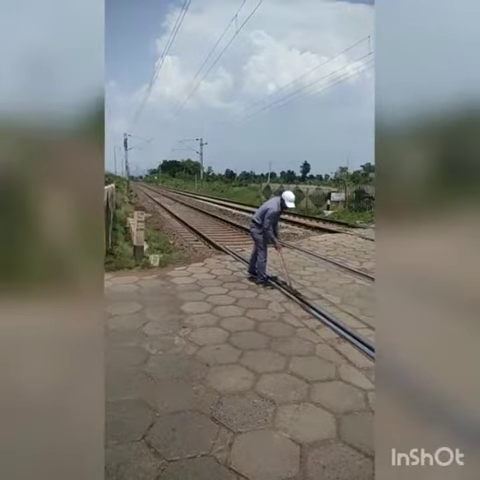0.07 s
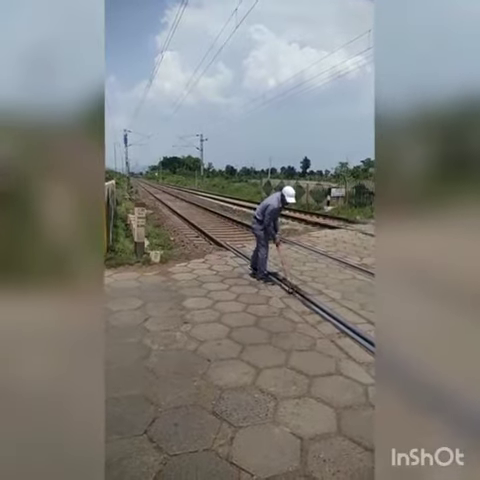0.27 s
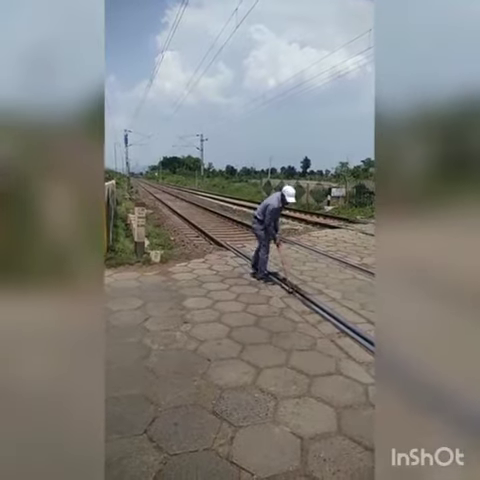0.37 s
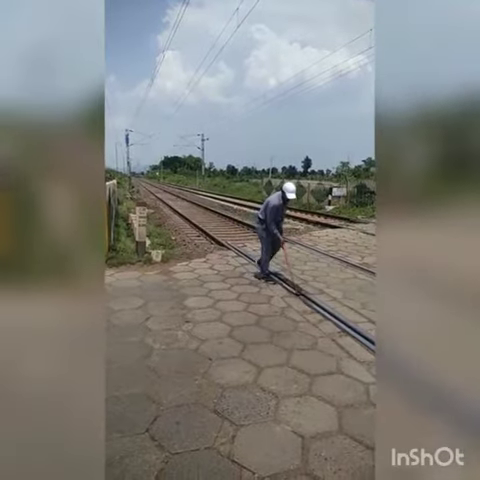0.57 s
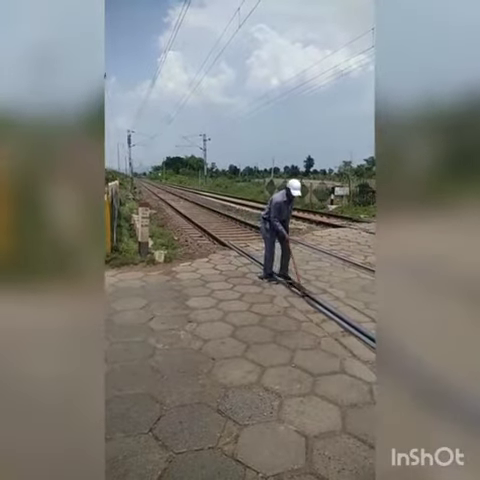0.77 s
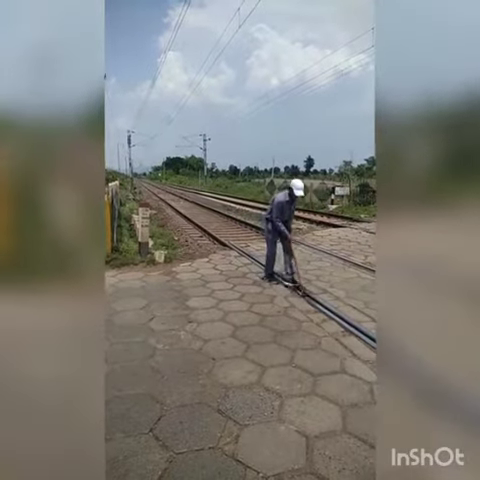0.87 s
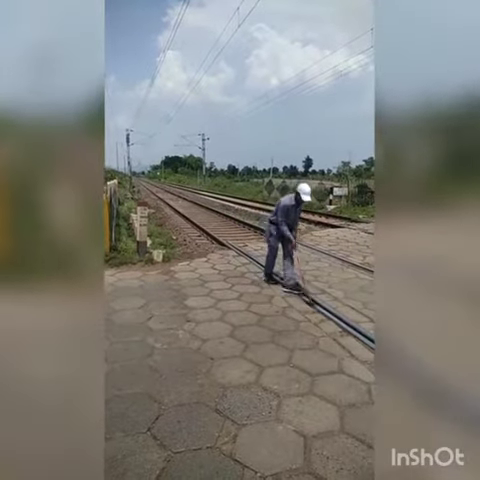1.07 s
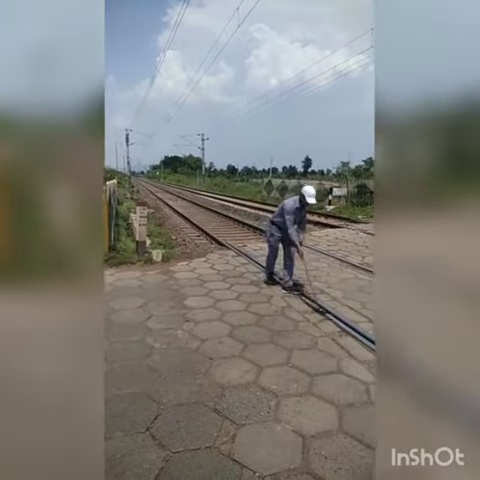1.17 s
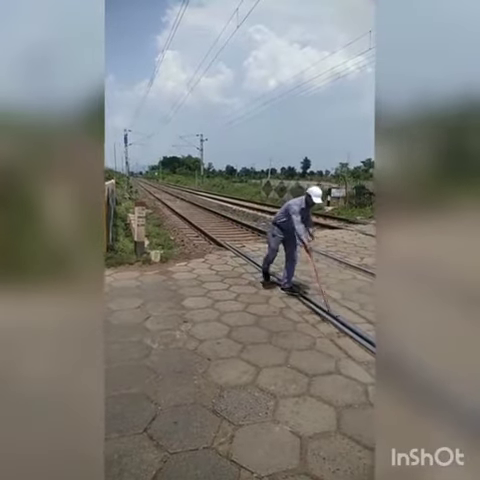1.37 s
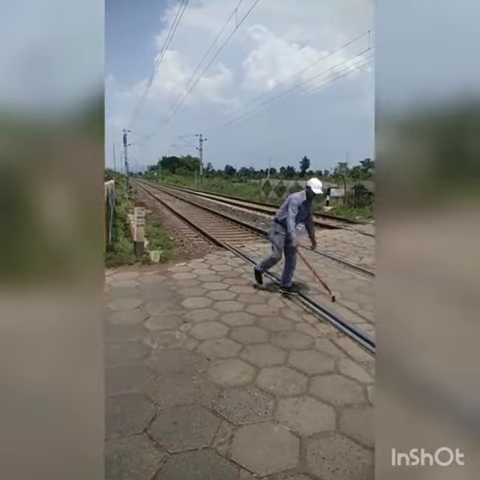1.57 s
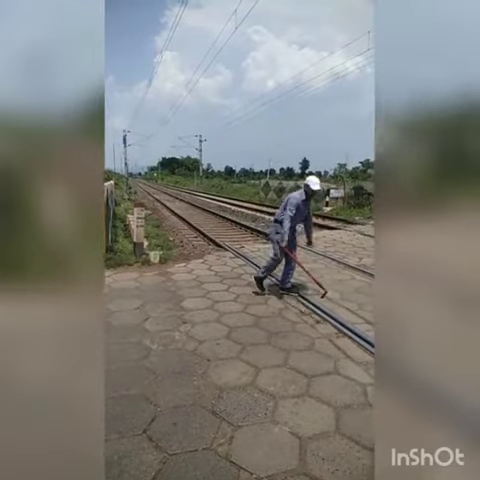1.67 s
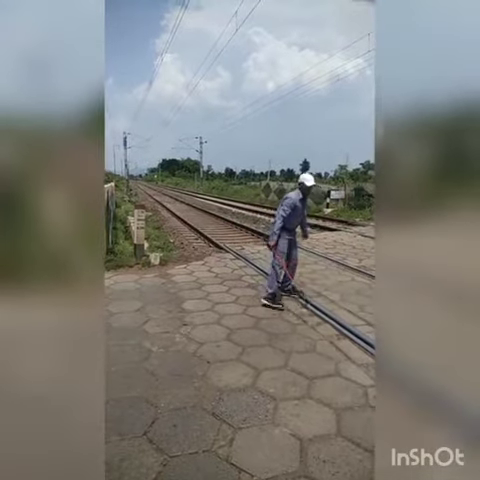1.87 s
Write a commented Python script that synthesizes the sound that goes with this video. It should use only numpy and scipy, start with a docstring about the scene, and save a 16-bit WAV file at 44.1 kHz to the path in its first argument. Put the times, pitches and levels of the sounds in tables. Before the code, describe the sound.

A metal rod scrapes along a rail a few metres away, grinding over grit and ringing as it catches, first briefly, then harder. Shoes scuff the paving, a distant engine chugs, birds call and light wind brushes the microphone.

```python
"""A metal rod scraping along a rail

A few metres away, a rod is pushed along the groove of a rail at a paved level crossing.
Its tip grinds over grit, catches and knocks, making the rod ring; shoes scuff the paving.
Far off a slow engine chugs and birds call; light wind buffets mostly the left microphone."""
import sys
import numpy as np
from scipy import signal
from scipy.fft import rfft, irfft, next_fast_len
from scipy.io import wavfile

SR = 44100
rng = np.random.default_rng(int(sys.argv[2]) if len(sys.argv) > 2 else 0)


def to_wav(s):
    """Save 16-bit WAV."""
    ch = np.atleast_2d(s).T  # columns
    pcm = np.round(np.clip(ch, -1, 1) * 32767)  # PCM
    wavfile.write(sys.argv[1], SR, pcm.astype(np.int16))


N = 83790
TIME = np.arange(N) / SR
EAR_LIKENESS = 0.33  # share of the scraping noise that both ears have in common


def undb(db):
    """Turn decibels into a number to multiply by."""
    return 10 ** (np.asarray(db) / 20)


def unit(x):
    """Scale a sound to an average power of 1."""
    return x / np.sqrt(np.mean(x ** 2) + 1e-20)


def curve(rows):
    """Join (time, value) rows by straight lines."""
    return np.interp(TIME, *np.array(rows).T)


def wander(rate, count=N):
    """Drift by about 1 either way, reaching a new random value `rate` times a second."""
    targets = rng.standard_normal(4096)
    return np.sqrt(3 / 2) * np.interp(np.arange(count) * rate / SR, np.arange(len(targets)), targets)


def swell(start, attack, decay):
    """A loudness shape: rise in a straight line, then die away."""
    age = TIME - start
    return np.clip(age / attack, 0, 1) * np.exp(-np.maximum(age - attack, 0) / decay)


def stereo_noise(shared):
    """Hiss for two ears, partly the same in both."""
    return np.sqrt(shared) * rng.standard_normal(N) + np.sqrt(1 - shared) * rng.standard_normal((2, N))


def grit(spread_db=2, grains_per_s=6500):
    """A dense stream of tiny clicks of unequal size."""
    hit = rng.random(N) < grains_per_s / SR
    size = undb(spread_db * np.minimum(rng.exponential(size=N), 4))
    return unit(hit * size * stereo_noise(EAR_LIKENESS))


def colour(x, points, size=8192):
    """Turn lows and highs up or down, following (Hz, dB) points."""
    hz, db = np.array(points).T
    freqs = np.maximum(np.arange(size // 2 + 1) * SR / size, 1)
    gains = undb(np.interp(np.log(freqs), np.log(hz), db))
    # fold the filter so that it never answers before the sound arrives
    cepstrum = irfft(np.log(gains))
    cepstrum[1:size // 2] *= 2
    cepstrum[size // 2 + 1:] = 0
    response = irfft(np.exp(rfft(cepstrum)))
    length = next_fast_len(N + size, True)
    return irfft(rfft(x, length) * rfft(response, length), length)[..., :N]


def ring(x, hz, width):
    """Ring at one pitch, keeping the power of plain hiss; a smaller width rings longer."""
    b, a = signal.iirpeak(hz, hz / width, fs=SR)
    return signal.lfilter(b, a, x) * np.sqrt(SR / (np.pi * width))


def clean_ring(x, hz, width):
    """Ring, then trim away more of the sound far from that pitch."""
    b, a = signal.iirpeak(hz, hz / (width + 950), fs=SR)
    return signal.lfilter(b, a, ring(x, hz, width))


def echoes(x, fade_s):
    """A blur of reflections, different in each ear, falling 60 dB in fade_s."""
    tail = rng.standard_normal((2, N)) * np.exp(-np.log(1000) * TIME / fade_s)
    tail /= np.sqrt(np.sum(tail ** 2, axis=1, keepdims=True))
    return signal.fftconvolve(np.atleast_2d(x), tail, axes=1)[:, :N]


# how loudly the tip slides: t/s, level/dB
SLIDE = [(0, -52), (.04, -49), (.10, -63.5), (.22, -48.5), (.29, -46), (.40, -39.5), (.46, -38),
         (.52, -43.5), (.61, -46.5), (.69, -38), (.78, -37.5), (.85, -41), (.895, -47), (.96, -35.5),
         (1.03, -42.5), (1.112, -44), (1.135, -30.5), (1.215, -31), (1.27, -29), (1.32, -30.5),
         (1.358, -35.5), (1.385, -24.5), (1.415, -27.5), (1.445, -55), (1.5, -49.5), (1.56, -58),
         (1.64, -47), (1.72, -81), (1.9, -56)]
# how hard the tip presses on the groove: t/s, pressure/0-1
PRESSURE = [(.95, 0.5), (1.12, 1), (1.27, 0.79)]
# how much the tip hops instead of sliding: t/s, share/0-1
HOPPING = [(.5, 1), (.66, 0.46), (.88, 0), (.97, 0.37), (1.12, 0.26), (1.255, 0), (1.282, 0.63),
           (1.32, .45), (1.39, 0.93)]
# the tip catches and knocks: t/s, level/dB, brightness/dB per octave
KNOCKS = [(0.4276, -16.5, -4), (0.4315, -21.5, -5.5), (0.4425, -18, -3.5), (0.4457, -20.5, -6.5),
          (0.454, -34, -10.5), (0.626, -37, -0.5), (0.769, -30.5, 3), (1.0431, -26.5, -4), (1.128, -37, -8),
          (1.169, -25.5, -3.5), (1.2016, -37, 7), (1.231, -25, 0), (1.2643, -21, -3), (1.268, -26, -6.5),
          (1.2803, -16, -3), (1.2885, -23.5, -7), (1.301, -37, -5), (1.328, -28, -7), (1.336, -24, -6),
          (1.342, -26, -5), (1.367, -30, 9), (1.3745, -37, 3), (1.3842, -28, 6), (1.393, -34, 8),
          (1.407, -23, 5), (1.412, -31.5, -9.5), (1.422, -38.5, -7.5)]
# the rod's own tones: f/Hz, level sliding lightly/dB, level pressed hard/dB, level struck/dB
ROD_TONES = [(752, -31, -33.5, -23), (1868, -7, -15, -11.5), (2012, -13, -16, -8), (2744, 2, -7.5, -2.5),
             (3080, -23, -3.5, -14.5), (3350, -7, -20, -5), (3506, -19, -27, -3), (4800, -16, -6.5, -9),
             (5060, -23, -20, -18.5), (5295, -19, -9.5, 2), (5547, 4, -21, -3.5), (5704, 14.5, -18, -4),
             (6187, 1.5, -5.5, -3), (6395, -6.5, 1.5, -2.5), (6900, -35, -12, -9.5), (7970, -33, -9, -6),
             (8610, 0, -2, -4), (8920, -9.5, 4.5, -14.5), (9475, -28, -1, -9), (9890, -23, -8, -6.5),
             (12170, -14, -11, -5.5), (12310, -3.5, -12, -14), (13000, -16, -2, -10),
             (13600, -27, -10, -17)]
# tone colour of the rasp at the tip: f/Hz, level/dB
RASP_COLOUR = [(300, -46.5), (700, 5.5), (1300, -5.5), (2000, -21), (2900, 9.5), (4000, -24.5), (6000, 3),
               (7500, -37), (9500, 2.5), (11000, -1), (13300, -31), (15000, -9)]

def rod():
    """Juddering slips rub the rod, knocks let it ring longer; pressure and hopping balance its tones."""
    slips = grit() * unit(undb(1.9 * wander(rate=148.5))) * undb(curve(SLIDE))
    starts, knock_db, tilt_db = np.array(KNOCKS).T
    catches = np.array([swell(start, attack=0.00071, decay=0.005) for start in starts])
    chatter = undb(-4.5) * stereo_noise(EAR_LIKENESS)
    press, hop = curve(PRESSURE), curve(HOPPING)
    middle_hz = np.median(np.array(ROD_TONES)[:, 0])
    ringing, power = 0, 0
    for hz, light_db, hard_db, struck_db in ROD_TONES:
        sizes = undb(knock_db + tilt_db * np.log2(hz / middle_hz))
        lag_s = .0015 * np.sqrt(middle_hz / hz) * rng.random(len(starts))  # high tones tend to lead
        # a knock is one sharp push followed by a short chatter
        pushes = np.bincount(((starts + lag_s) * SR).astype(int), sizes, N)
        force = undb(18.5) * pushes + chatter * (sizes @ catches)
        struck = clean_ring(force, hz, width=62)
        rubbed = clean_ring(slips, hz, width=130) * unit(undb(4 * wander(rate=30.05)))
        sliding_db = (1 - press) * light_db + press * hard_db
        gain = undb((1 - hop) * sliding_db + hop * struck_db)
        ringing += gain * (rubbed + struck)
        power += gain ** 2
    rasp = colour(slips + chatter * (undb(knock_db) @ catches), RASP_COLOUR)
    return ringing / np.sqrt(power) + undb(-8) * rasp


# tone colour of the open air: f/Hz, level/dB
AIR_COLOUR = [(25, -6), (120, -1.5), (250, -4), (400, -7.5), (650, 11), (1300, -6.5), (1550, 4.5),
              (2700, -12.5), (3300, -12.5), (5000, -4), (7500, -56), (11000, -3), (15000, -41)]

def air():
    """A soft outdoor hiss whose level drifts a little."""
    hiss = rng.standard_normal((2, N)) + rng.standard_normal(N)
    return unit(colour(hiss, AIR_COLOUR)) * undb(-52.5 + wander(rate=4.58))


# gusts of wind: t/s, level/dB, fade/s
GUSTS = [(0.133, -38.5, 0.063), (0.499, -32, 0.071), (0.631, -45, 0.039), (0.763, -38.5, 0.086),
         (1.075, -43.5, 0.064), (1.121, -39, 0.04), (1.421, -42, .03), (1.674, -38, 0.089)]
# tone colour of the wind's rumble: f/Hz, level/dB
WIND_COLOUR = [(25, -28), (55, -21), (90, -9.5), (130, -1.5), (190, -1), (240, -11.5), (320, -27.5),
               (500, -51)]

def wind():
    """Gusts and a steady low flutter hit the microphone, mostly on the left."""
    gusts = sum(undb(db) * swell(start, 0.016, fade) for start, db, fade in GUSTS)
    buffet = gusts * unit(colour(rng.standard_normal((2, N)), WIND_COLOUR))
    rumble = ring(rng.standard_normal((2, N)), hz=120.6, width=34)
    flutter = undb(-49.5) * unit(colour(rumble, WIND_COLOUR))
    return (buffet + flutter) * undb([[0], [-24]])  # left, right


# tone colour of the engine's clatter: f/Hz, level/dB
CLATTER_COLOUR = [(300, -30.5), (440, -30.5), (590, 3), (680, -2.5), (790, 2.5), (910, 0.5), (1050, -11),
                  (1200, -2), (1320, -14.5), (1520, 0), (1750, -8.5), (2600, -6.5), (3200, -27),
                  (5000, -9.5), (9000, -87)]

def engine(firings_per_s=8.94, first_firing_s=.034):
    """Each slow firing rings the exhaust; the moving parts clatter four times per firing."""
    age = TIME - first_firing_s
    since_firing = age % (1 / firings_per_s)
    since_clack = (age - 0.0012) % (1 / (4 * firings_per_s))
    firing_fade = np.exp(-since_firing / 0.03)
    puffs = firing_fade * np.minimum(since_firing / 0.003, 1) * undb(wander(rate=67))
    exhaust_hz = 908 + 14 * wander(rate=120)
    exhaust = puffs * np.sin(2 * np.pi * np.cumsum(exhaust_hz) / SR)
    clacks = np.exp(-since_clack / 0.025) * (1 + .5 * firing_fade)
    clatter = colour(clacks * stereo_noise(shared=0.77), CLATTER_COLOUR)
    return undb(-50.5) * unit(exhaust) + undb(-45) * unit(clatter)


def bird_note(start, length, from_hz, to_hz, db):
    """A hoarse, fluttering whistle that glides between two pitches."""
    count = int(length * SR)
    progress = np.linspace(0, 1, count)
    hz = (from_hz + (to_hz - from_hz) * progress) * (1 + .026 * wander(690, count))
    arch = np.sqrt(2 * np.abs(np.sin(np.pi * progress)))
    flutter = unit(undb(3.5 * wander(318, count)))
    whistle = undb(db) * arch * flutter * np.sin(2 * np.pi * np.cumsum(hz) / SR)
    return np.pad(whistle, (int(start * SR), N))[:N]


# notes of one falling call: t/s into the call, length/s, start f/Hz, end f/Hz, level/dB
CALL_NOTES = [(0, .042, 4720, 4860, -43), (0.012, .032, 6500, 6050, -46), (0.035, .045, 5750, 5550, -42),
              (.062, .022, 4050, 4500, -39), (.078, 0.028, 4950, 5020, -43), (.09, .025, 4150, 3950, -39),
              (0.113, 0.04, 3750, 3500, -43), (0.155, 0.05, 3450, 3600, -46)]
# when the bird calls: t/s, added level/dB
CALLS = [(0.297, 2.5), (0.905, -0.5)]
# a second bird's chirps: t/s, length/s, start f/Hz, end f/Hz, level/dB
CHIRPS = [(0.106, 0.065, 3304, 3266, -47), (0.151, 0.031, 2920, 2950, -46), (1.795, 0.109, 2780, 2940, -47)]
FIELD_ECHO_S = 0.26

def birds():
    """Two falling calls and a few lower chirps echo over the field."""
    song = sum(bird_note(at + start, length, from_hz, to_hz, db + call_db)
               for at, call_db in CALLS for start, length, from_hz, to_hz, db in CALL_NOTES)
    song += sum(bird_note(*chirp) for chirp in CHIRPS)
    return song + undb(-4) * echoes(song, FIELD_ECHO_S)


# shoe scuffs: t/s, level/dB, fade/s
SCUFFS = [(0.232, -29.5, 0.016), (0.703, -39, 0.0054), (.928, -44, 0.045), (0.955, -33.5, 0.046),
          (1.368, -44, 0.14), (1.491, -39, 0.0043), (1.602, -34.5, 0.034), (1.716, -45, 0.038)]
# tone colour of a scuff: f/Hz, level/dB
SCUFF_COLOUR = [(250, -26), (430, -20.5), (580, 4), (740, -2), (940, 3.5), (1300, -4.5), (1550, -6.5),
                (2500, -1.5), (3300, -9.5), (5000, -4.5), (7000, -10.5), (11000, -18.5), (15000, -32)]

def shoes():
    """Soles grind sand on the paving."""
    effort = sum(undb(db) * swell(start, 0.0069, fade) for start, db, fade in SCUFFS)
    return effort * unit(colour(grit(spread_db=0.5), SCUFF_COLOUR))


# short rough sounds: t/s, level/dB, fade/s, centre f/Hz, width/Hz
ROUGH_BURSTS = [(0.571, -38, 0.03, 3600, 1300), (0.649, -39, .03, 3550, 1000),
                (0.703, -41.5, 0.018, 1180, 796), (.728, -43.5, 0.023, 1440, 600),
                (0.958, -42, 0.023, 940, 80), (.99, -41, 0.077, 3900, 400),
                (1.342, -35.5, 0.019, 1360, 590), (1.381, -35.5, 0.038, 1480, 900)]

def rough_bursts():
    """The burst at 0.99 s is the hoarse, fading tail of the bird's second call.
    The others are grit crushed under the tip, lower for bigger stones."""
    return sum(undb(db) * swell(start, 0.0052, fade) * unit(clean_ring(grit(), hz, width))
               for start, db, fade, hz, width in ROUGH_BURSTS)


# how much louder the left ear is than the right: f/Hz, level/dB
LEFT_OVER_RIGHT = [(300, 5), (600, -4.5), (950, 10), (1300, -2), (2700, 2), (3800, 4.5), (5000, 13.5),
                   (6500, 6), (9000, 9), (13000, 13)]

def scene():
    """Mix near and far sounds with their echoes, share them between the ears, add air and wind."""
    foreground = rod() + rough_bursts() + shoes()
    direct = foreground + engine()
    ground_echo = undb(-13) * echoes(direct, fade_s=0.092)
    field_echo = undb(-12.5) * echoes(foreground, FIELD_ECHO_S)
    left, right = direct + ground_echo + field_echo + birds()
    left = colour(left, [(hz, db / 2) for hz, db in LEFT_OVER_RIGHT])
    right = colour(right, [(hz, -db / 2) for hz, db in LEFT_OVER_RIGHT])
    return undb(-1.5) * np.array([left, right]) + air() + wind()


def record(dry, dull_hz=14050, top_hz=15800):
    """The phone dulls the highest treble and cuts off the very top."""
    dull = signal.sosfilt(signal.butter(6, dull_hz, fs=SR, output="sos"), dry)
    return signal.sosfilt(signal.ellip(8, .2, 70, top_hz, fs=SR, output="sos"), dull)


dry = scene()
out = record(dry)
to_wav(out)
```